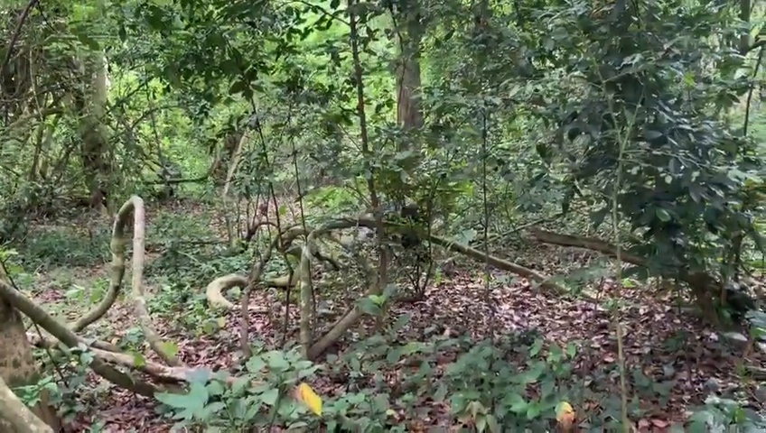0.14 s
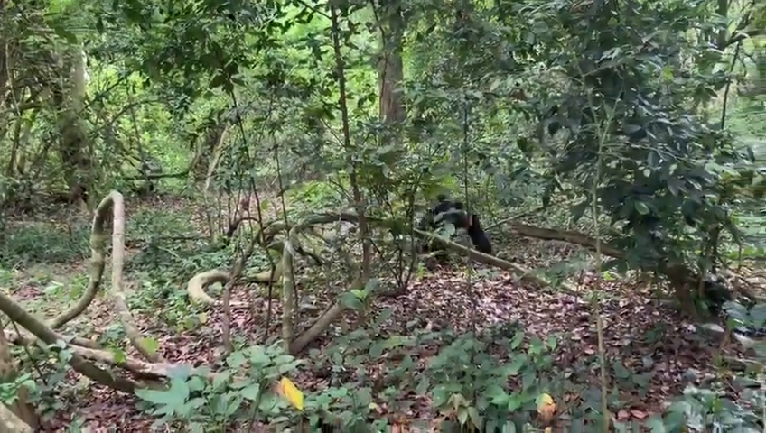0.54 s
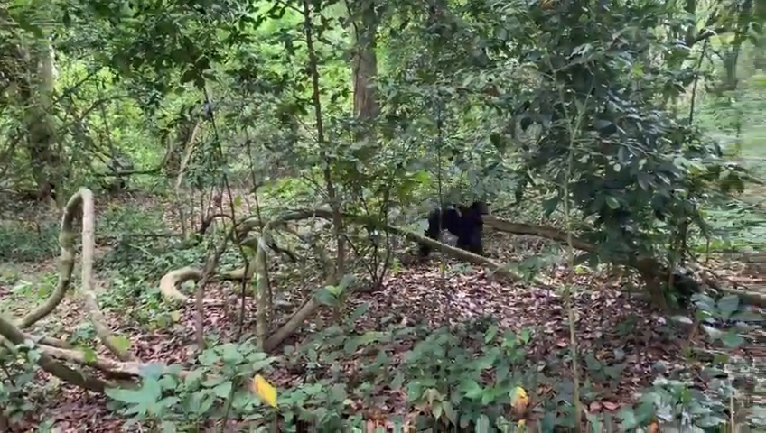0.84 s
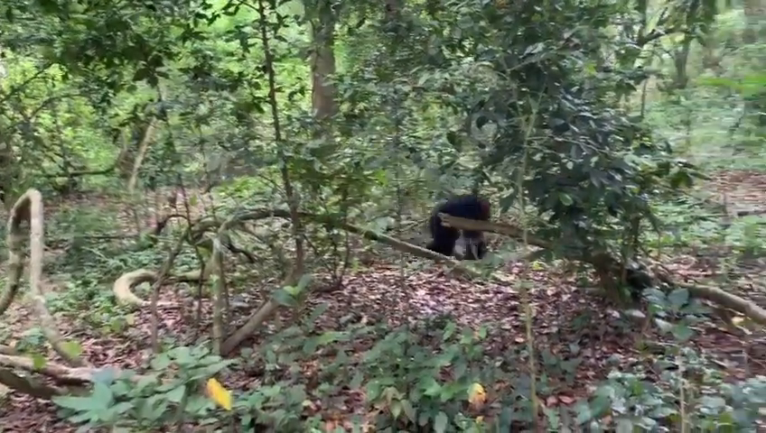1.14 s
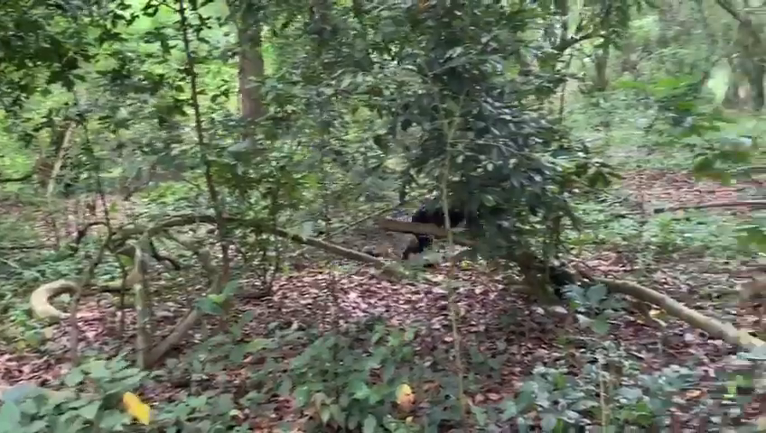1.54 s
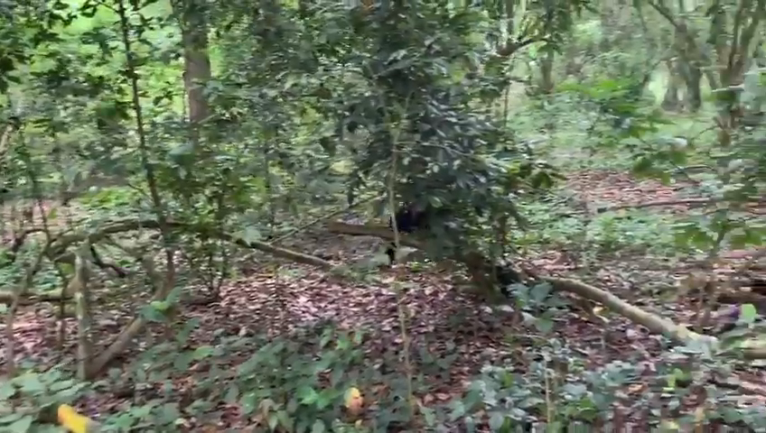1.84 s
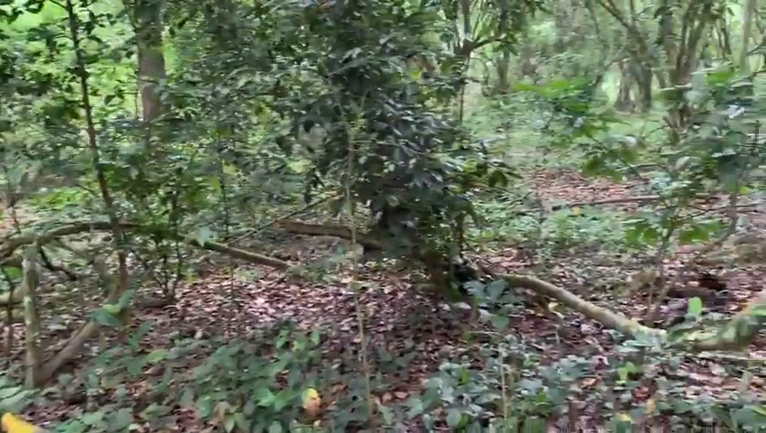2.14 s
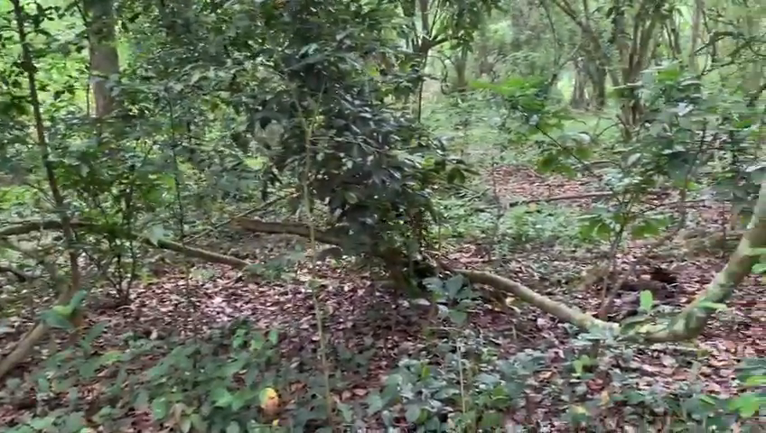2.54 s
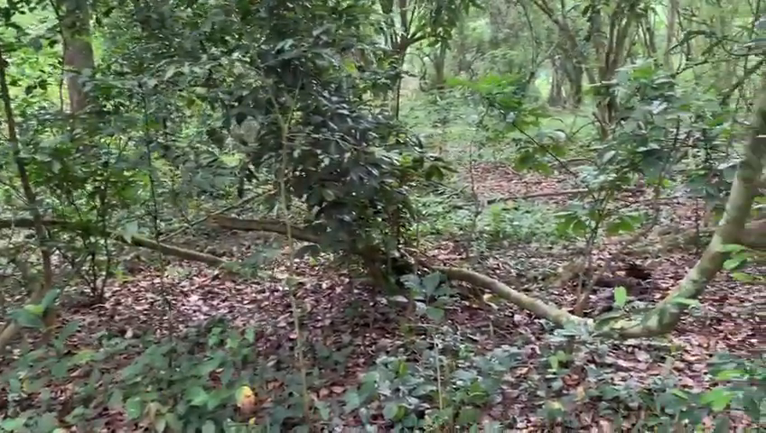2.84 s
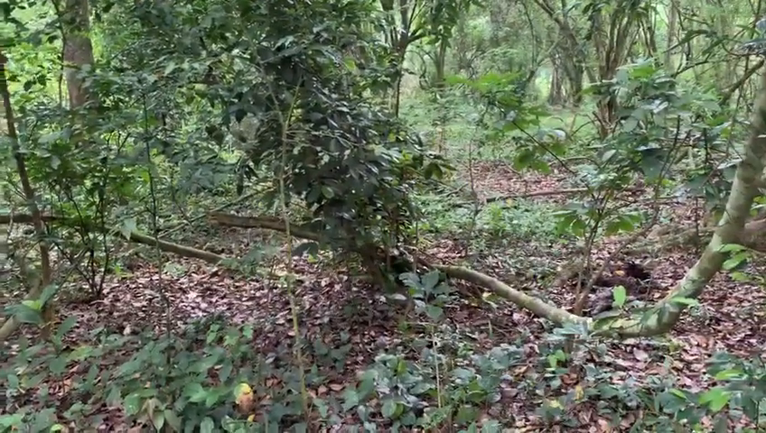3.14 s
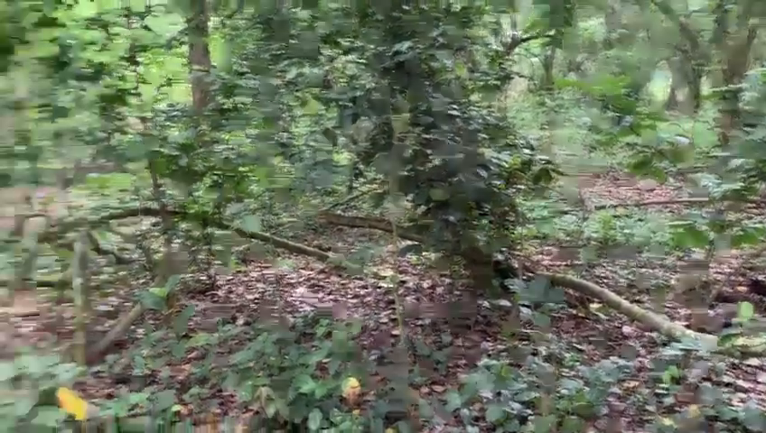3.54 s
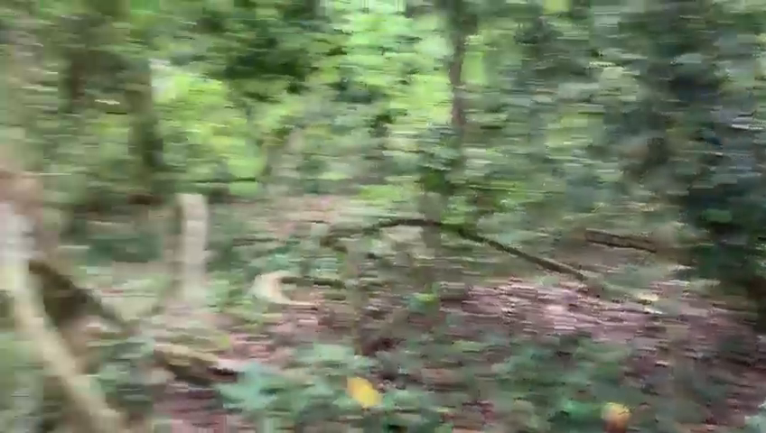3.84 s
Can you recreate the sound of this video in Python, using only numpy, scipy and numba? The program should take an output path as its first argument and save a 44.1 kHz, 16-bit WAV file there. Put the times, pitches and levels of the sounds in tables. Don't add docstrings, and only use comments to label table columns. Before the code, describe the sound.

Close chimpanzee calls, scream first, then hoots alternating with raspy breaths, echoing softly among trunks as its body scuffles. After two seconds only fading leaf crackle, insect hiss and distant bird notes remain, on a phone-like stereo microphone.

```python
import sys
import numpy as np
from scipy import signal
from scipy.fft import rfft, irfft
from scipy.io import wavfile
from scipy.ndimage import uniform_filter1d
from numba import njit

SR = 44100
rng = np.random.default_rng(int(sys.argv[2]) if len(sys.argv) > 2 else 0)


def generate_wav(signal):
    frames = np.transpose(np.atleast_2d(signal))
    scaled = np.clip(frames, -1, 1) * 32767
    pcm = np.round(scaled).astype(np.int16)
    wavfile.write(sys.argv[1], SR, pcm)


def natural_amplitude(level_db):
    exponent = np.asarray(level_db, float) / 20
    return 10 ** exponent


N = 176400

# time_s, pitch_hz, level_db
SCREAM_CALL = [
    (0, 1200, -12.5),
    (.05, 1190, -13.5),
    (.07, 1104, -12.5),
    (.12, 1090, -11.5),
    (.15, 1063, -12.5),
    (.165, 1067, -12),
    (.19, 850, -16.5),
    (.2, 810, -32.5),
]
GASP_CALL = [
    (0.205, 448.7, -29.5),
    (0.243, 420, -21),
    (.275, 418, -23.5),
    (.3, 470, -18),
    (0.335, 480, -24.5),
]
FIRST_HOOT = [
    (.29, 591, -34),
    (.33, 593, -29.5),
    (0.345, 572.8, -18),
    (.4, 546.7, -20),
    (0.501, 519, -19),
    (0.519, 474.6, -24.5),
    (0.526, 340, -23),
    (0.544, 306.2, -29),
    (0.558, 288.4, -39),
]
YELP_CALL = [
    (0.567, 364.4, -27),
    (0.584, 417.8, -17),
    (0.612, 563.7, -34),
]
SECOND_HOOT = [
    (0.611, 395.8, -23),
    (0.632, 415, -18),
    (0.648, 406, -18),
    (0.719, 426, -21.5),
    (0.752, 436, -18.5),
    (0.801, 456.6, -11),
    (0.832, 433.6, -10),
    (0.864, 463.6, -23),
]
WHOOP_CALL = [
    (.865, 465, -30),
    (.9, 627.8, -23.5),
    (0.911, 774, -15),
    (0.931, 800, -9),
    (0.952, 781.4, -12.5),
    (0.961, 694, -23),
    (0.99, 622, -27.5),
    (1.013, 599, -49.5),
]
FIRST_GROWL = [
    (1.025, 128.4, -39.5),
    (1.042, 127.9, -24.5),
    (1.088, 136.8, -19),
    (1.153, 128.2, -21.5),
    (1.203, 127.5, -18.5),
    (1.292, 121.6, -19),
    (1.32, 125.7, -27),
    (1.346, 123.5, -42),
]
THIRD_HOOT = [
    (1.361, 351.9, -31.5),
    (1.374, 382.1, -13),
    (1.393, 416.3, -13.5),
    (1.422, 477.6, -15.5),
    (1.447, 449.8, -14.5),
    (1.492, 501.5, -15.5),
    (1.513, 357.5, -16.5),
    (1.547, 364.2, -18.5),
    (1.583, 266.9, -30.5),
]
SECOND_GROWL = [
    (1.628, 98.8, -48),
    (1.64, 97.05, -28.5),
    (1.699, 90.3, -28.5),
    (1.756, 76.55, -33.5),
    (1.799, 89.8, -24),
    (1.841, 92.4, -30.5),
    (1.877, 88.7, -31),
    (1.922, 79.4, -29.5),
    (1.955, 71.73, -31.5),
    (1.981, 68.46, -43),
]
# time_s, level_db
LAST_GRUNTS = [
    (1.989, -39),
    (2.025, -33.5),
    (2.238, -43),
    (2.29, -65),
]
# time_s, pitch_hz, level_db
SIGH_CALL = [
    (2.3, 131.9, -82),
    (2.338, 129.4, -48),
    (2.4, 110.6, -74),
]
GRUNT_HZ = 62.4
# from_hz, to_hz, second_resonance_hz, second_resonance_db, fundamental_db
MOUTH_SHAPES = [(1177, 854, 2120, -4, -26.5), (792, 870, 720, 0, -19), (590, 787, 1060, -2, -20.5),
                (1200, 1500, 980, 2, -29), (830, 1000, 1350, 0, -44), (800, 1100, 2300, -7.5, -29.5),
                (771, 560, 1043, -7.5, -30.5), (850, 832, 1273, -11.5, -30.5), (340, 335, 729, -6.5, -17),
                (238.1, 120, 617, -16.5, -11), (136.2, 207.3, 370, -50, -7)]
# brightness_db, breath_db, first_partial_db, mouth_sharpness_q, dulling_over_call_db
VOICE_COLOURS = [(-1, -16.5, -2.5, 4.1, -1.9), (-28, -22, -3, 2, 0.96), (-34, -27, 0, 3.7, -3.5),
                 (-18, -19.5, 1.5, 4.32, 3.8), (-5, -31.5, -11, 3.18, -24), (-25, -22.5, 1, 2.94, -7),
                 (-21.5, -23.5, -2, 3.656, -1.1), (-18.5, -32, 0, 4.9, 2.5), (-41, -35, -9.5, 4.4, -6),
                 (-50, -26.5, 6, 2.55, -15.5), (-67, -36, 2.5, 3.8, 0.1)]
# rate_times_pitch, depth_ratio, until_s, roughness_before_0to1, roughness_after_0to1
FOLD_BEATS = [(.052, .97, .062, .12, .02), (1 / 3, .9, .285, .22, .08), (.5, .03, 1, .09, .05),
              (.5, .3, 1, .3, 0), (.5, .03, .67, .15, .03), (.5, .01, 1.1, .06, .03),
              (.5, .25, 1.17, .36, .14), (.5, .3, 1.48, .12, .08), (2, 1.2, 1.77, .42, .2),
              (.5, .5, 2.3, 1, 0), (.5, 0, 3, .2, 0)]
# centre_hz, width_hz, level_db
THROAT_RESONANCES = [(1930, 250, 6), (2650, 170, 4), (3204, 240, 4.5), (4515, 780, -3), (6000, 680, -27),
                     (8580, 4400, -2.5)]
EFFORT = 0.56
SLOPE_DB, ROUGH_DULL_DB = -8, -61.5
SLACK_S = 0.08
PATCHY_DB, PATCHY_ROUGH_DB = 2.5, 9
TOP_PARTIAL_HZ = 12400

# time_s, level_db
BODY_SCUFFLE = [
    (0, -43.5),
    (.35, -47.5),
    (.62, -55.5),
    (.75, -67.5),
]
TRUNKS_T60_S, TRUNKS_DB, TRUNKS_DAMP = 1.076, -26, 0.18
# centre_hz, width_hz, level_db
NEAR_INSECTS = [(5510, 500, -68), (6860, 2000, -63.5)]
# centre_hz, width_hz, level_db
DISTANT_INSECTS = [(4300, 600, -84.5)]
# frequency_hz, density_db_per_hz
AIR_SPECTRUM = [(15, -31), (25, -1.5), (70, -2.5), (145, -10.5), (473, -16), (1600, -33.5), (2080, -60),
                (3520, -120)]
AIR_DB = -73
# time_s, level_db
LEAF_LEVELS = [
    (1.599, -55.5),
    (2.06, -66.5),
    (2.5, -65.5),
    (2.799, -72.5),
    (3.399, -75),
    (3.75, -78.5),
    (4.0, -77.5),
]
# centre_hz, width_hz, level_db
LEAF_COLOURS = [(1880, 380, -6), (2700, 1200, -2), (3240, 1000, -1)]
# start_s, length_s, from_hz, to_hz, level_db
BIRD_NOTES = [(2.885, .04, 2050, 1956, -70.5), (2.964, 0.048, 2145, 1550, -63),
              (3.03, 0.076, 2790, 2861, -57.5), (3.066, 0.061, 2980, 3060, -55),
              (3.142, 0.087, 1700, 2596, -57), (3.152, 0.06, 3012, 2934, -71),
              (3.215, 0.016, 2200, 1530, -78), (3.24, .025, 1893, 2150, -63),
              (3.267, 0.0597, 2650, 2234, -58), (3.301, .04, 1900, 2140, -68),
              (3.333, 0.044, 2500, 2570, -69), (3.476, .015, 2190, 1400, -76),
              (3.98, .03, 2607, 2590, -63.5)]
# frequency_hz, left_lead_rad
PORT_LEAD = [(0, 0.037), (500, 0.12), (1200, 0.2), (1800, 0.63), (3360, 2.4), (4130, 7.95), (7900, 6.72),
             (10000, 9), (12000, 7)]


def level(x, db):
    return x * natural_amplitude(db) / np.sqrt(np.mean(x ** 2) + 1e-18)


@njit
def svf(x, hz, width):
    y, b, l = np.empty(len(x)), 0., 0.
    for i in range(len(x)):
        g, k = np.tan(np.pi * hz[i] / SR), width[i] / hz[i]
        v = (b + g * (x[i] - l)) / (1 + g * (g + k))
        b, l, y[i] = 2 * v - b, l + 2 * g * v, k * v
    return y


def band(x, hz, width):
    return svf(x, hz + 0 * x, width + 0 * x)


def below(x, top_hz):
    return signal.sosfilt(signal.ellip(8, 1, 60, top_hz, fs=SR, output="sos"), x)


def walk(rate, size=N):
    held = rng.standard_normal(size)[(np.arange(size) * rate / SR).astype(int)]
    k = int(SR / rate) + 1
    return 1.2 * uniform_filter1d(uniform_filter1d(held, k), k)


def pair(like):
    mid, side = rng.standard_normal((2, N))
    like = np.clip(like, 0, 1)
    return mid * np.sqrt(1 + like), side * np.sqrt(1 - like)


def hiss(bands, like, flicker_db, grain=1.):
    out = 0
    for hz, width, db in bands:
        mid, side = (band(band(v * grain, hz, width), hz, width) for v in pair(like))
        flicker = natural_amplitude(flicker_db * walk(24) + .5 * walk(1))
        out = out + level(mid + side * np.array([[1], [-1]]), db) * flicker
    return out


def vocal_folds(phase, pitch, mean_hz, rough, first_db, beat_rate, beat_depth):
    out = 0
    for k in range(1, int(TOP_PARTIAL_HZ / max(mean_hz, 250))):
        gain = natural_amplitude(SLOPE_DB * np.log2(k))
        if beat_rate > 1 and k % beat_rate == 0:
            gain = gain * (1 + beat_rate * beat_depth)
        waver_db = (k > 2) * (PATCHY_DB + PATCHY_ROUGH_DB * rough) * walk(30, size=len(phase))
        gain = gain * natural_amplitude(first_db * (k == 1) + waver_db) * (k * pitch < TOP_PARTIAL_HZ)
        out = out + gain * np.cos(k * phase + 0.12 * k * k * rough.max())
    return out


def mouth_and_throat(source, high, pitch, mouth, q, dull):
    from_hz, to_hz, second_hz, second_db, chest_db = mouth
    opening = np.linspace(from_hz, to_hz, len(source))

    def twice(x, hz):
        return band(band(x, hz, 1.3 * hz / q), hz, 1.3 * hz / q)

    first = twice(source, opening)
    second = natural_amplitude(second_db + dull) * twice(source, second_hz) * second_hz / opening
    chest = natural_amplitude(chest_db) * band(source, pitch, pitch / 2)
    out = level(first - second + chest, 0)
    for k, (hz, width, db) in enumerate(THROAT_RESONANCES):
        out = out + (-1) ** k * natural_amplitude(db + 6.5) * band(high, hz, width)
    return out - 0.47 * band(out, 1400, 570)


def call(rows, mouth, voice, beat, t):
    s, hz, db = np.array(rows, float).T
    bright_db, breath_db, first_db, q, dull_db = voice
    beat_rate, beat_depth, until_s, rough_before, rough_after = beat
    a, b = int(max(s[0] - .004, 0) * SR), int((s[-1] + .004) * SR)
    t = t[a:b]
    pitch = uniform_filter1d(np.interp(t, s, hz), 500, mode="nearest")
    contour_db = np.interp(t, s, db)

    beating = np.clip((until_s - t) / 0.004, 0, 1)
    slack = np.clip((t - s[-1] + SLACK_S) / 0.0088, 0, 2)
    rough = rough_before * beating + rough_after * (1 - beating) * (1 + slack)
    rough_rate = hz.mean() * 1.4
    jitter = .2 * rough * walk(rough_rate)[a:b] + (.003 + .06 * rough) * walk(40)[a:b]
    phase = 2 * np.pi * np.cumsum(pitch * (1 + jitter)) / SR

    folds = vocal_folds(phase, pitch, hz.mean(), rough, first_db, beat_rate, beat_depth * beating)
    folds = level(folds * natural_amplitude(7 * rough * walk(rough_rate)[a:b]), 0)
    puffs = rng.standard_normal(N)[a:b] * (1 + 0.14 * np.cos(phase))
    breath = level(below(puffs, 9200), breath_db)
    depth = beating * (beat_rate < 1) * beat_depth
    throb = (1 + depth * np.cos(beat_rate * phase - 1.6)) / np.sqrt(1 + depth ** 2 / 2)

    dull = dull_db * np.linspace(0, 1, b - a)
    rough_dull = ROUGH_DULL_DB * (rough - rough.min())
    effort_db = EFFORT * (contour_db - db.max())
    high = natural_amplitude(bright_db + dull + rough_dull + effort_db) * folds + breath / 2
    high = high * (0.35 + .4 * throb)
    out = mouth_and_throat(folds * throb + natural_amplitude(5.5) * breath, high, pitch, mouth, q, dull)

    even = np.sqrt(uniform_filter1d(uniform_filter1d(out ** 2, 1100), 1100) + 1e-12)
    edge = np.clip(np.minimum(t - t[0] + (a == 0), t[-1] - t) / .005, 0, 1)
    return np.pad(out / even * natural_amplitude(contour_db) * edge, (a, N - b))


def chimpanzee(t):
    grunts = [(s, GRUNT_HZ, db) for s, db in LAST_GRUNTS]
    calls = [SCREAM_CALL, GASP_CALL, FIRST_HOOT, YELP_CALL, SECOND_HOOT, WHOOP_CALL,
             FIRST_GROWL, THIRD_HOOT, SECOND_GROWL, grunts, SIGH_CALL]
    return sum(call(*c, t) for c in zip(calls, MOUTH_SHAPES, VOICE_COLOURS, FOLD_BEATS))


def scuffle(t):
    s, db = np.array(BODY_SCUFFLE).T
    body = hiss([(82.0, 320, 0), (215, 110, 0), (536, 480, -2.8)], 0.98, 4)
    return level(body, 0) * natural_amplitude(np.interp(t, s, db, right=-120))


@njit
def echoes(x, lags, gain, damp):
    line, soft, out = np.zeros((8, 8192)), np.zeros(8), np.zeros((2, len(x)))
    for i in range(len(x)):
        total = 0.
        for k in range(8):
            soft[k] += (1 - damp) * (gain[k] * line[k, (i - lags[k]) & 8191] - soft[k])
            total += soft[k]
            out[k % 2, i] += soft[k]
        for k in range(8):
            line[k, i & 8191] = x[i] + soft[k] - total / 4
    return out


def trunks(ape, song):
    lags = rng.integers(500, 3600, 8)
    sent = band(ape, 670, 520) + natural_amplitude(8.5) * band(ape, 5600, 6500) + natural_amplitude(13) * song
    out = echoes(sent + 1e-18, lags, natural_amplitude(-60 * lags / SR / TRUNKS_T60_S), TRUNKS_DAMP)
    return natural_amplitude(TRUNKS_DB) * (out + 0.36 * out[::-1])


def insects():
    high_pass = signal.ellip(4, 1, 22, 4950, "high", fs=SR, output="sos")
    near = signal.sosfilt(high_pass, hiss(NEAR_INSECTS, .3, .7))
    return below(near, 7550) + hiss(DISTANT_INSECTS, .3, 2.2)


def air():
    hz = 30 * 2 ** np.arange(0, 6, .5)
    table_hz, table_db = np.array(AIR_SPECTRUM).T
    db = np.interp(np.log(hz), np.log(table_hz), table_db) + 10 * np.log10(hz)
    return level(hiss(zip(hz, hz / 2, db), 1.0, 1.3), AIR_DB)


def leaves(t):
    s, db = np.array(LEAF_LEVELS).T
    grain = natural_amplitude(2 * rng.exponential(size=N))
    crackle = below(hiss(LEAF_COLOURS, .4, 3, grain), 3450)
    return level(crackle, 0) * natural_amplitude(np.interp(t, s, db))


def bird(t):
    out = 0
    for s, length, from_hz, to_hz, db in BIRD_NOTES:
        u = np.clip((t - s) / length, 0, 1)
        f = to_hz + (from_hz - to_hz) * (1 - u) ** 3
        loudness = natural_amplitude(db) * np.sin(np.pi * u ** .6) * (1 + walk(300) / 2)
        out = out + loudness * np.sin(2 * np.pi * np.cumsum(f * (1 + .025 * walk(300))) / SR)
    return out


def scene():
    t = np.arange(N) / SR
    ape = chimpanzee(t)
    song = bird(t)
    return ape + scuffle(t) + trunks(ape, song) + insects() + air() + leaves(t) + song


def top_cut(x):
    return signal.sosfilt(signal.butter(12, 12310, fs=SR, output="sos"), x)


def record(dry):
    hz, lead = np.array(PORT_LEAD).T
    turn = np.exp(.5j * np.interp(np.arange(N + 1) * SR / (2 * N), hz, lead))
    mix = irfft(rfft(dry, 2 * N) * np.array([turn, turn.conj()]))[:, :N]
    return top_cut(mix)


dry = scene()
out = record(dry)
generate_wav(out)
```